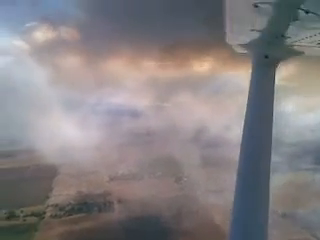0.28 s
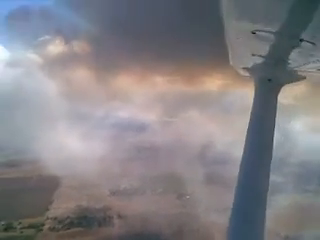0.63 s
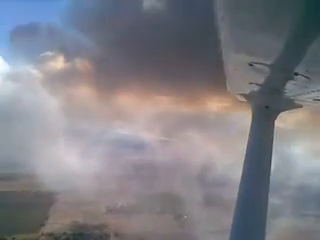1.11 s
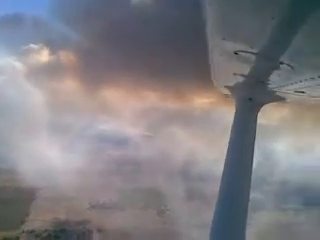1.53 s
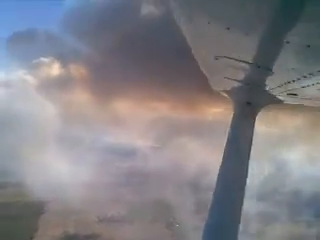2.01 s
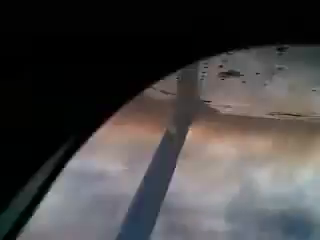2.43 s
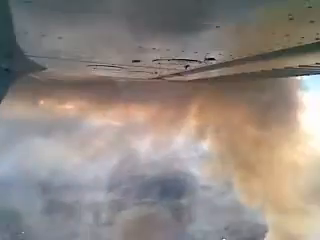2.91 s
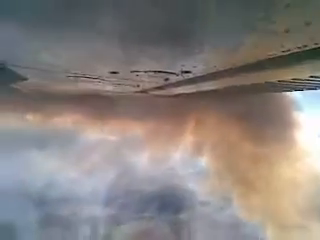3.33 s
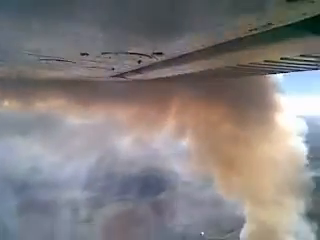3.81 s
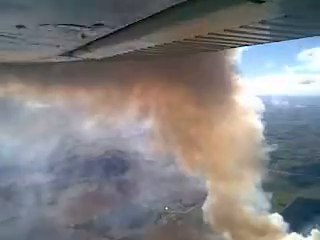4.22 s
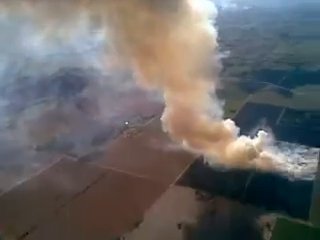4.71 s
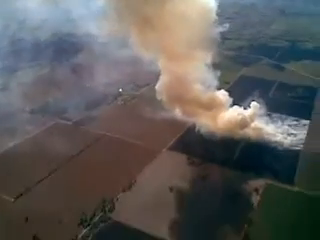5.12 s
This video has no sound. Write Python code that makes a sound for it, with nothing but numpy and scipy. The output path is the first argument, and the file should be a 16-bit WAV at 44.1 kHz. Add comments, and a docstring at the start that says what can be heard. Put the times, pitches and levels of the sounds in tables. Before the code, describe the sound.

A cruising light aircraft heard from inside its cabin on a small hand-held camera microphone with limited treble. From the first instant a deep piston-engine and propeller drone, around 72 beats a second, runs without pause, sagging in pitch almost imperceptibly, with a rough buzz above it and a dense rush of air pulsing along. At about 2.2 seconds a hand bumps the camera: a loud, short, dull knock with a tiny dry scuff. As the microphone swings past the window frame, around 2.4 to 2.6 seconds, a brief airy surge passes and the drone becomes differently coloured, fuller low down. Between roughly 2.9 and 4.1 seconds the cabin resonates hollowly, and narrow wavering howls swell softly, clearest near 3.0, 3.8 and 5.1 seconds. Around 4.7 seconds a gusty draught opens at the window edge, brighter and closer, hissing over the drone until the abrupt end at about 5.4 seconds.

```python
"""Inside a small high-wing aircraft in cruise, a four-cylinder engine and its two-blade propeller drone in rushing air.
The drone and its buzz are harmonics locked to one firing phase; the rush is shaped noise that pulses with that phase.
A hand-held microphone at a side window swings round, is bumped (decaying modes), and crosses the standing waves,
so the drone changes colour while a howl (narrow resonant noise) comes in swells.
At last the microphone comes close to a hissing draught at the window edge, which is bright shaped noise."""
import sys
import numpy as np
from scipy import signal
from scipy.fft import rfft, irfft
from scipy.io import wavfile

SR = 44100
rng = np.random.default_rng(int(sys.argv[2]) if len(sys.argv) > 2 else 0)


def dump(signal):
    """Clip the signal to [-1, 1] and save it as 16-bit WAV at the path in sys.argv[1]."""
    limited = np.clip(np.atleast_2d(signal).T, -1, 1)
    pcm = np.round(limited * 32767).astype(np.int16)
    wavfile.write(sys.argv[1], SR, pcm)


N = 237610

# firing and blade rate: start, linear sag, rms wander as a share of the rate
START_HZ, SAG_HZ_PER_S, WANDER = 72.76, .15, .0012
# the microphone swings from the side window into the cabin: middle and length of the swing
TURN_S, TURN_LENGTH_S = 2.306, 0.55
# the microphone reaches the window edge: middle and length of the approach
EDGE_S, APPROACH_S = 4.695, .17


def undb(db):
    """Logarithmic level: 20 dB is a factor of ten in amplitude."""
    return 10 ** (np.asarray(db) / 20)


def ease(middle_s, length_s):
    """Gradual transition: half a sine period carries a control from 0 to 1."""
    part = np.clip((np.arange(N) / SR - middle_s) / length_s, -.5, .5)
    return .5 + .5 * np.sin(np.pi * part)


def swell(middle_s, half_width_s):
    """Gaussian envelope: a bell-shaped rise to 1 and back, at 1/e one half-width from its middle."""
    return np.exp(-((np.arange(N) / SR - middle_s) / half_width_s) ** 2)


def walk(rate_hz):
    """Low-passed random process: smooth chance of rms 1, changing about rate_hz times a second."""
    hz = np.fft.rfftfreq(N, 1 / SR)
    slow = irfft(rfft(rng.standard_normal(N)) / (1 + (hz / rate_hz) ** 4), N)
    return slow / slow.std()


def tone(phase, flutter, rate_hz):
    """Propagation through turbulence: a line of rms near 1 flutters in size and phase."""
    path = 1 + flutter * (walk(rate_hz) + 1j * walk(rate_hz))
    return np.sqrt(2) * np.real(path * np.exp(1j * phase))


# reflections off the close walls ripple the spectrum: rms depth, spacing, frequency of full depth
RIPPLE_DB, RIPPLE_STEP_HZ, RIPPLE_FROM_HZ = 1.5, 36, 700


def air(spectrum):
    """Broadband turbulence: noise of a given spectral density, falling beyond both ends, rippled by reflections."""
    hz = np.fft.rfftfreq(N, 1 / SR) + 1e-9
    points, db = np.transpose(spectrum)
    ends = np.minimum(hz / points[0], 1) ** 2 * np.minimum(points[-1] / hz, 1) ** 20
    grid = np.arange(0, SR / 2, RIPPLE_STEP_HZ)
    strands = np.interp(hz, grid, rng.standard_normal(len(grid)))
    ripple = RIPPLE_DB * np.minimum(hz / RIPPLE_FROM_HZ, 1) ** 2 * strands
    gain = undb(np.interp(np.log(hz), np.log(points), db) + ripple) * ends
    # white noise of rms 1 has density 1 / (SR / 2), so this scale makes the table dB per Hz
    return irfft(rfft(rng.standard_normal(N)) * gain, N) * np.sqrt(SR / 2)


def resonance(hz, width_hz):
    """Resonance excited by noise: two equal peak filters in cascade, each 2 * width_hz wide, rms 1."""
    b, a = signal.iirpeak(hz, hz / width_hz / 2, fs=SR)
    once = signal.lfilter(b, a, rng.standard_normal(N))
    ringing = signal.lfilter(b, a, once)
    return ringing / ringing.std()


def wavering(hz, width_hz, waver_hz):
    """Frequency modulation: the centre of a narrow resonance wanders by waver_hz rms with the airflow."""
    drift = 2 * np.pi * np.cumsum(waver_hz * walk(5)) / SR
    return np.real(signal.hilbert(resonance(hz, width_hz)) * np.exp(1j * drift))


# nodes (-) and antinodes (+) of the cabin's standing waves that the microphone drifts through:
# [harmonic number, t/s, half-width/s, level change/dB]
STANDING_WAVES = [(5, 1, 0.56, 2), (3, 0.98, 0.43, 3), (3, 2.6, 0.16, -6.5), (6, 2.74, 0.17, 4.5),
                  (6, 3.71, 0.79, -12), (2, 4.02, 0.29, 2.5), (3, 4.38, 0.48, 5.5), (3, 4.92, 0.065, -8.5),
                  (6, 4.86, 0.18, 4.5), (3, 2.6, 0.28, 2.5), (5, 1.7, .25, -4), (5, 2.72, .07, -3.5),
                  (5, 4.45, 0.17, -4), (1, 1.33, .16, -1.5), (1, 3.03, 0.18, -2.6), (1, 5.05, .3, 0.9)]


def harmonic_db(order, side_db, turned_db, change_s, length_s):
    """Standing-wave field: the level of a harmonic depends on where the microphone is."""
    waves = sum(db * swell(s, width) for k, s, width, db in STANDING_WAVES if k == order)
    return side_db + (turned_db - side_db) * ease(change_s, length_s) + waves


# as the microphone crosses the cabin the upper harmonics slip behind: distance, middle and length of the move
TRAVEL_M, TRAVEL_S, TRAVEL_LENGTH_S = 0.76, 3.34, 3
# harmonics of the firing rate, each changing over at its own point of the swing, before the standing waves:
# [harmonic number, level at the side/dB, level turned/dB, middle of change t/s, length of change/s]
DRONE = [(1, -21.5, -20.5, 1.9, 1.4), (2, -40, -27.5, 2.55, 1.4), (3, -36, -31, 3.12, 0.53),
         (5, -30, -36.5, 2.62, 0.21), (6, -26.5, -35.5, 3.16, 0.18)]


def drone(firing_phase, spread_rad=0.63, flutter=0.036):
    """Fourier synthesis of exhaust beats and blade passes: low harmonics roughly line up in one pressure dip a cycle."""
    first, *upper = DRONE
    travel = ease(TRAVEL_S, TRAVEL_LENGTH_S)
    out = undb(harmonic_db(*first)) * tone(firing_phase, flutter=0.016, rate_hz=2.3)
    for order, *levels in upper:
        above = order - 1
        # the cabin smears the higher harmonics more
        scatter = spread_rad * above * rng.standard_normal()
        lag = 2 * np.pi * above * START_HZ * TRAVEL_M / 343 * travel  # 343 m/s: speed of sound
        line = tone(order * firing_phase + scatter - lag, flutter=flutter * above, rate_hz=6)
        out += undb(harmonic_db(order, *levels)) * line
    return -out  # crests become dips


# weaker lines; unequal cylinders put some between the harmonics of the firing rate:
# [quarters of the firing rate, rounded when played; level at the side/dB, turned/dB, at the window edge/dB]
OVERTONES = [(9, -49, -44, -35.5), (14, -48.5, -50, -46), (16, -39, -44.5, -39), (17, -45.5, -49, -45),
             (22, -42.5, -49.5, -42), (26, -50, -52.5, -57), (28, -44, -45.5, -55), (32, -44, -48.5, -50),
             (36, -47.5, -47, -41), (40, -43.5, -48, -53.5), (44, -48.5, -46.5, -51),
             (48, -50, -46.5, -45.5), (52, -55.5, -53, -50), (56, -54.5, -55.5, -59.5), (64, -51, -59, -56),
             (68.56, -52.5, -56, -63.5), (83.4, -53.5, -66.5, -63)]


def overtones(firing_phase, turn, near):
    """Periodicity of the four-firing engine cycle: the buzz lies on multiples of a quarter of the firing rate."""
    out = np.zeros(N)
    for quarters, side_db, turned_db, edge_db in OVERTONES:
        start = 2 * np.pi * rng.random()
        level_db = side_db + turn * (turned_db - side_db) + near * (edge_db - turned_db)
        out += undb(level_db) * tone(np.round(quarters) * firing_phase / 4 + start, flutter=.25, rate_hz=5.3)
    return out


# cabin resonances that stand out after the turn, before RUSH_DB: [f/Hz, width/Hz, level/dB]
PANELS = [(637, 45, -42.5), (776, 45, -42.5), (2526, 35, -49)]


def panels():
    """Forced resonance: cabin modes ring under the noise of the slipstream."""
    return sum(undb(db) * resonance(hz, width) for hz, width, db in PANELS)


def boom():
    """Cabin resonance: a narrow mode swells as the microphone passes the middle of the window."""
    passing = ease(2.93, 0.18) * (1 - ease(4.07, 0.18))
    return undb(-37.5) * passing * wavering(824, 32, waver_hz=25.06)


# air rushing past the cabin at the side window, before RUSH_DB: [f/Hz, level/dB per Hz]
RUSH_SIDE = [(20, -62), (45, -48.5), (110, -48.5), (230, -49), (480, -57.5), (750, -57.5), (1100, -62.5),
             (1500, -67), (1750, -76), (2650, -70), (3500, -79.5), (4300, -82.5), (4750, -88.5),
             (6200, -101)]
# the same air after the turn, before RUSH_DB: [f/Hz, level/dB per Hz]
RUSH_TURNED = [(20, -59), (50, -48.5), (115, -46.5), (185, -50.5), (280, -55), (490, -59), (820, -58.5),
               (1050, -66), (1400, -69.5), (1830, -79.5), (2150, -67), (2620, -71.5), (2900, -77),
               (4100, -81.5), (5200, -91.5), (6200, -103)]


def slipstream(turn):
    """Boundary-layer noise on skin and windows: an equal-power crossfade follows the turning microphone."""
    turned = air(RUSH_TURNED) + panels()
    return np.sqrt(1 - turn) * air(RUSH_SIDE) + np.sqrt(turn) * turned + boom()


# overall gain of the rush, and its fade once the microphone leans away
RUSH_DB, RUSH_FADE_FROM_S, RUSH_FADE_DB_PER_S = -2, 3.44, 1
# the window frame shields the microphone from the hiss of the rush: [t/s, half-width/s, level change/dB]
SHADOWS = [(2.62, 0.09, -2.5), (4.65, 0.045, -1.5)]
# pulsing of the air noise with the engine: [multiple of firing rate, depth in the roar, depth in the hiss]
THROBS = [(.25, .03, .03), (.5, .08, .035), (1, .06, .075), (2, .08, .035), (3, .04, .02)]


def rush(firing_phase, turn, split_hz=950):
    """Amplitude modulation: roar and hiss pulse with the engine cycle, each shaft turn and each blade's wash."""
    wind = slipstream(turn)
    roar = signal.sosfiltfilt(signal.butter(4, split_hz, fs=SR, output="sos"), wind)
    shadow_db = sum(db * swell(s, width) for s, width, db in SHADOWS)
    hiss = (wind - roar) * undb(shadow_db)
    throb = sum(np.cos(k * firing_phase) * (low * roar + high * hiss) for k, low, high in THROBS)
    fade_db = RUSH_FADE_DB_PER_S * np.maximum(np.arange(N) / SR - RUSH_FADE_FROM_S, 0)
    return undb(RUSH_DB - fade_db) * (roar + hiss + throb)


def ringing_hiss(turn, near):
    """Resonances of the airflow: broad rings join in the cabin, by the window frame, and at its edge."""
    cabin = turn * undb(-55) * resonance(2310, 200)
    # a bright surge as the microphone swings past the window frame
    frame = undb(-42.5) * swell(2.56, 0.24) * resonance(2387, 100)
    # a higher ring joins in as the camera tilts down
    tilted = undb(-46.5) * ease(3.92, 0.56) * resonance(2615, 74)
    edge = np.sqrt(near) * undb(-39) * resonance(2230, 210)
    return cabin + frame + tilted + edge


# camera body modes, relative to one another: [f/Hz, level/dB, t60/s]
BODY = [(50, -7, .1), (115, -1, .07), (195, 0, .06), (280, -3, .04), (620, -13, .02), (840, -3.5, .025),
        (1300, -18, .015), (1850, -20, .015)]


def body_ring(age):
    """Modal decay: each mode of the camera body rings as a sine that falls 60 dB in its t60."""
    return sum(undb(db - 60 * age / t60) * np.sin(2 * np.pi * hz * age) for hz, db, t60 in BODY)


# dry scuff of the fingers for a 0 dB bump, before its decay: [f/Hz, level/dB per Hz]
SCUFF = [(300, -51), (900, -51), (1700, -57), (3000, -62), (4500, -74)]


def finger_scuff(age, t60_s=.035):
    """Friction noise: a shaped burst dies away exponentially."""
    return undb(-60 * age / t60_s) * air(SCUFF)


# bumps of the hand on the camera: [t/s, peak level of the ring/dB, contact time/s]
BUMPS = [(2.2208, -4.8, .0009), (2.2248, -17, .0004), (2.2365, -21, .004)]


def bumps():
    """Impact excitation: a soft contact rings the camera body for a moment, with a brief scuff."""
    out = np.zeros(N)
    for s, peak_db, contact_s in BUMPS:
        age = np.maximum(np.arange(N) / SR - s, 0)
        push = 1 - np.exp(-(age / contact_s) ** 2)  # flesh pushes gradually
        ring = push * body_ring(age)
        scuff = push * finger_scuff(age)
        out += undb(peak_db) * (ring / np.abs(ring).max() + scuff)
    return out


# swells of the howl: [t/s, peak of the rms envelope/dB]
HOWLS = [(2.519, -41), (3.0, -31), (3.42, -41), (3.77, -32.5), (4.161, -39.5), (4.85, -43), (5.14, -34)]


def howl():
    """Flow-excited resonance: a narrow, wavering howl comes in swells of 0.13 s half-width."""
    swells = sum(undb(db) * swell(s, 0.13) for s, db in HOWLS)
    return swells * wavering(645, 13, waver_hz=9)


def gusts():
    """Unsteady flow: the level of the draught varies by 0.8 dB rms."""
    return undb(.8 * walk(9))


# finest hiss of the gap, heard in full only right in front of it: [f/Hz, level/dB per Hz]
JET = [(2900, -73), (3800, -74), (5000, -76.5), (6800, -85), (7800, -101.5)]


def gap_jet(near):
    """Directivity of a jet: bright in front of the gap, duller when the swing grazes it from the side."""
    jet = air(JET) * gusts()
    off_axis = signal.sosfilt(signal.butter(8, 4800, fs=SR, output="sos"), jet)
    return jet * near * ease(4.85, 1) + off_axis * undb(-10) * swell(2.43, .13)


# draught at the window edge: [f/Hz, level/dB per Hz]
DRAUGHT = [(1100, -74), (1480, -70), (1640, -64.5), (1830, -70.5), (2150, -67), (2620, -71), (2900, -87),
           (4000, -80), (6500, -84.5)]


def draught(near):
    """Turbulent leakage flow: gusty hiss at the window edge, brighter as the microphone closes in."""
    return air(DRAUGHT) * near * gusts() + gap_jet(near)


def scene():
    """Phase locking: one firing phase drives the drone, its buzz and the pulsing of the air."""
    t = np.arange(N) / SR
    firing_hz = (START_HZ - SAG_HZ_PER_S * t) * (1 + WANDER * walk(4.7))
    firing_phase = 2 * np.pi * np.cumsum(firing_hz) / SR
    turn = ease(TURN_S, TURN_LENGTH_S)
    near = ease(EDGE_S, APPROACH_S)
    engine = drone(firing_phase) + overtones(firing_phase, turn, near)
    flow = rush(firing_phase, turn) + ringing_hiss(turn, near) + howl() + draught(near)
    return (engine + flow + bumps())[None]


def record(dry):
    """Band limitation: the sound fades in over 6 ms, and the small camera cuts the treble above 8400 Hz."""
    opening = np.minimum(np.arange(N) / SR / .006, 1)
    return signal.sosfilt(signal.ellip(8, .2, 70, 8400, fs=SR, output="sos"), dry * opening)


dry = scene()
out = record(dry)
dump(out)
```